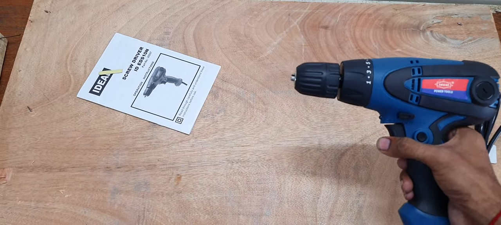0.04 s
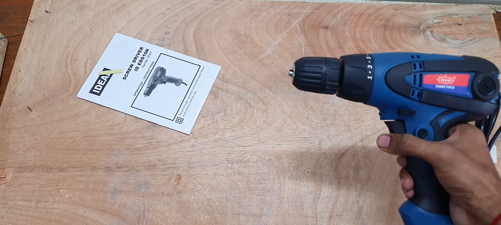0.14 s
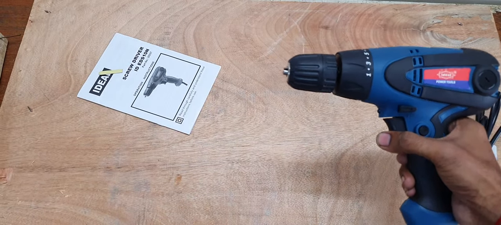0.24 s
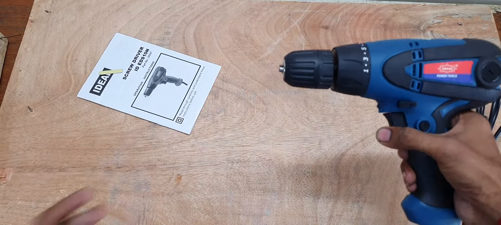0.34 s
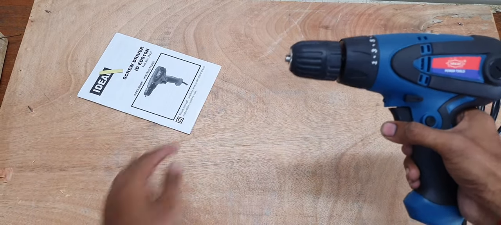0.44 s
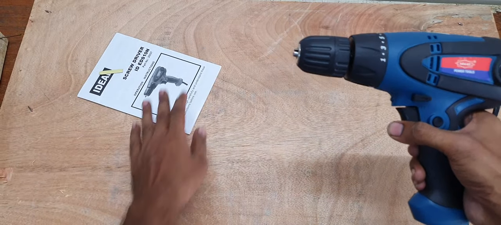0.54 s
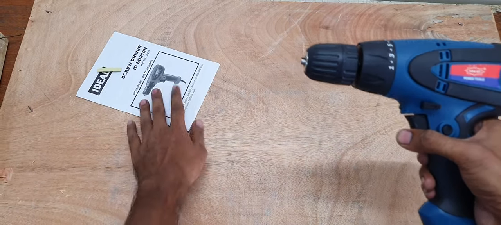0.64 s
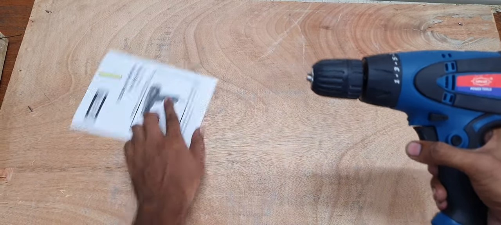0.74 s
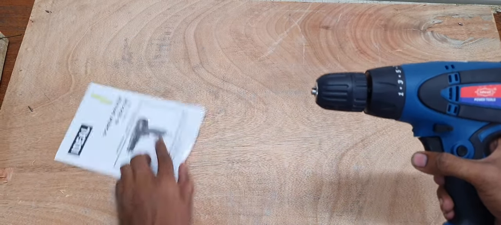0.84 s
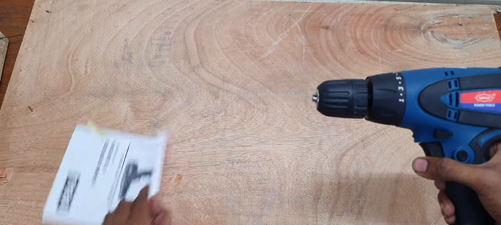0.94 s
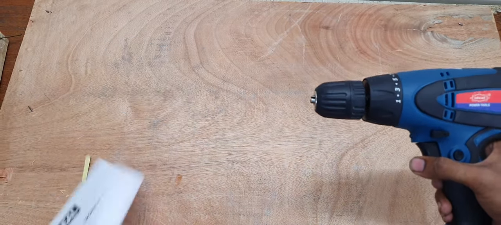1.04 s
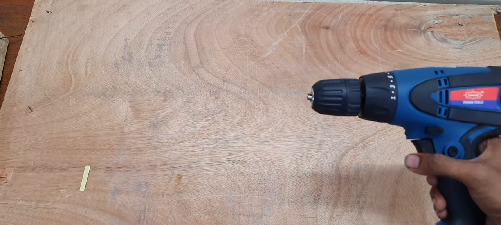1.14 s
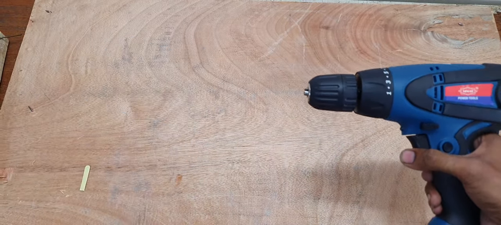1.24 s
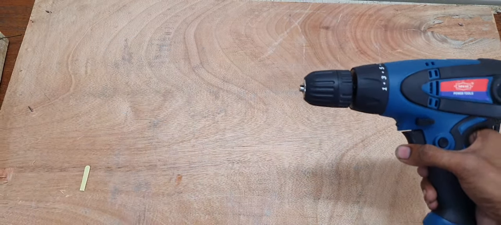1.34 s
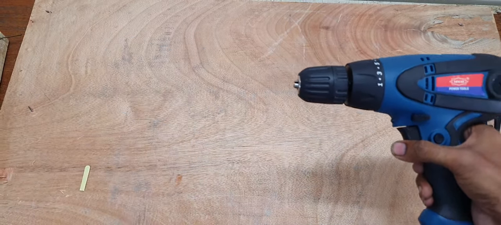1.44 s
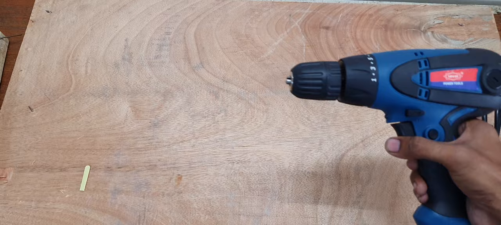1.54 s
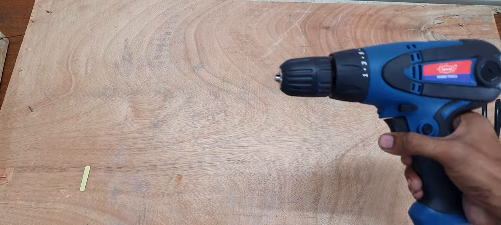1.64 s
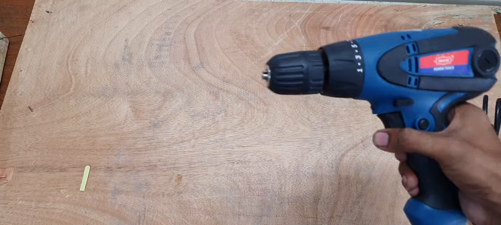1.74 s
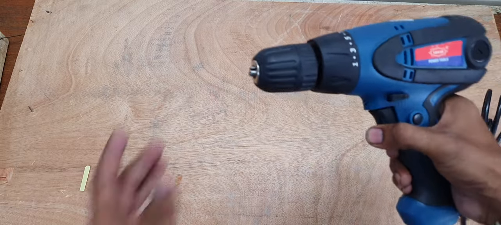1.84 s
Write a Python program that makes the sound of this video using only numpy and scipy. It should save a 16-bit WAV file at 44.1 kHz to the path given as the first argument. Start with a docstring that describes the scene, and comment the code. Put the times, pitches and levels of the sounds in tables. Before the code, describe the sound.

Quick knocks and scuffs on a wooden board die away, paper is dragged off with a bright swish and one small click, then near quiet with a hand shifting on an idle tool; low indoor rumble, close microphone.

```python
"""Over a low rumble that swells and sinks, something wooden is knocked and rattles to rest on a plywood bench.
A leaflet slides off the bench with one sharp tick; then a hand shifts on an idle power drill, itself silent.
Struck things are clicks into ringing modes; paper, grip and room air are coloured noise on level curves;
cracks are bursts of treble noise and rubs are noise in one narrow resonance. Hits also excite a dull room."""
import sys
import numpy as np
from scipy import signal
from scipy.fft import rfft, irfft
from scipy.io import wavfile

SR = 44100
rng = np.random.default_rng(int(sys.argv[2]) if len(sys.argv) > 2 else 0)


def generate_wav(signal):
    """Clip the signal to [-1, 1] and save it as 16-bit WAV at the path in sys.argv[1]."""
    frames = np.transpose(np.atleast_2d(signal))
    scaled = np.clip(frames, -1, 1) * 32767
    pcm = np.round(scaled).astype(np.int16)
    wavfile.write(sys.argv[1], SR, pcm)


N = 83790   # length in samples


def amp(db):
    """dB to gain."""
    return 10 ** (np.asarray(db) / 20)


def rms_one(x):
    """Scale to rms 1, all channels together."""
    return x / np.sqrt(np.mean(x ** 2) + 1e-20)


def in_time(rows):
    """Read level curves in dB at every sample, -120 dB outside their span."""
    s, *columns = np.transpose(rows)
    t = np.arange(N) / SR
    return [np.interp(t, s, column, left=-120, right=-120) for column in columns]


def at_hz(points, hz):
    """Read a spectrum on a log frequency axis."""
    point_hz, value = np.transpose(points)
    return np.interp(np.log(hz + 1), np.log(point_hz), value)


def drift(rate_hz):
    """Slow random movement of rms 1: noise through two equal poles, on a grid of 40 samples."""
    r = np.exp(-2 * np.pi * rate_hz * 40 / SR)
    noise = rng.standard_normal(N // 40 + 2002)
    slow = signal.lfilter([1], [1, -2 * r, r * r], noise)[2000:]   # drop the filter's start
    return np.interp(np.arange(N) / 40, np.arange(len(slow)), rms_one(slow))


def ring(x, hz, t60_s):
    """One resonant mode: a unit click sets off a decaying sine of height 1."""
    r = amp(-60 / (t60_s * SR))
    w = 2 * np.pi * hz / SR
    return signal.lfilter([0, np.sin(w)], [1, -2 * r * np.cos(w), r * r], x + 1e-18)


def low(x, hz):
    """Two-pole low-pass."""
    sos = signal.butter(2, np.clip(hz, 30, .45 * SR), fs=SR, output="sos")
    return signal.sosfilt(sos, x)


def coloured(spectrum, grain_db=0., patchy_db=0.):
    """Stereo noise of a spectrum, rms 1: grain flickers it all, patchiness moves each octave on its own."""
    # left-right likeness of the noise: hz, likeness (0 to 1)
    likeness = [(60, 0.94), (180, 0.96), (400, 0.87), (800, 0.07), (1650, 0.02), (5000, 0.012),
                (15000, .05)]
    hz = np.fft.rfftfreq(N, 1 / SR)
    mid, side = rfft(rng.standard_normal((2, N)) * amp(grain_db * drift(150)))
    alike = np.clip(at_hz(likeness, hz), 0, 1)
    stereo = np.sqrt(1 + alike) * mid + np.sqrt(1 - alike) * side * [[1], [-1]]
    stereo = amp(at_hz(spectrum, hz)) * stereo
    octave = np.log2(hz + 1)
    out = 0
    for k in range(3, 16):
        band = np.clip(1 - abs(octave - k), 0, 1)   # overlapping triangles
        out = out + irfft(stereo * band, N) * amp(patchy_db * drift(10))
    return rms_one(out)


def knocks():
    """Soft contacts and dying rattles ring the wood's modes; fine grit grinds its upper modes in between."""
    # the knocks: start_s, level_db, middle_db and upper_db (modes against the lowest), rattle_t60_s
    knock_rows = [(.182, -5, 1.5, -10, 0.0069), (.185, -12, -7, 0, 0.014), (0.2002, -10.5, -3, -6, 0.021),
                  (0.2094, -11, 2.5, -1, 0.014), (0.229, -18, -5, 3, 0.019), (0.262, -14, -2, 2, 0.041),
                  (0.269, -16.5, -13, 1, 0.025), (.279, -19, -14, 3, 0.057), (.294, -14.5, 0.5, -14, 0.028),
                  (0.31, -13, 1.5, -6, 0.036), (.317, -16, -3, -11, 0.041), (.333, -29, -3, 0, 0.044),
                  (.376, -20.5, 4.5, -3, 0.081), (.394, -28, 7, -3, 0.18), (0.426, -8, -2.5, -5, 0.047),
                  (0.437, -27.5, -2, 8, 0.023), (0.448, -21, 4, 3.5, 0.05), (.472, -21, -6.5, -3.5, 0.044),
                  (.499, -22, 1.5, -0.5, 0.061), (0.514, -39, 8, -7, 0.023)]
    # modes the wood rings with: pitch_hz, level_db, t60_s
    wood_modes = [(97, -10.5, 0.15), (287, 3, 0.039), (302, 0, 0.011), (369, 1.5, 0.033), (485, -4, 0.046),
                  (550, 0, 0.041), (672, 4, 0.015), (698, 3, 0.024), (888, -1.5, 0.022), (962, 2.5, 0.019),
                  (1133, -2.5, 0.036), (1182, -2.5, 0.03), (1515, -1.5, 0.014), (1711, -13, 0.084),
                  (2015, -2, 0.0057), (2540, -31, 0.013), (2850, -9, 0.0075), (3190, -21, 0.018)]
    # wood scuffing between knocks: time_s, grind_db, treble_db
    scuff = [(.179, -42, -40), (.183, -31, -38), (.215, -45, -37.5), (.259, -62, -42.5), (.2615, -63, -36),
             (.272, -50, -38.5), (.29, -37, -37), (.3, -62, -39), (.33, -57, -42), (.363, -59, -44.5),
             (.393, -49, -41), (.422, -66, -41.5), (.432, -39, -42), (.45, -42, -41.5), (.481, -45, -46.5),
             (.5, -54, -43.5), (.519, -39, -50), (.54, -60, -45), (.593, -53, -64), (.63, -62, -48.5)]
    # loudness of the modes under grinding: pitch_hz, level_db
    grind_modes = [(800, -14), (1300, -5), (1900, 0), (2500, -4), (3200, -10)]
    # treble of the scuffing: pitch_hz, level_db (relative, per Hz)
    scuff_treble = [(2000, 5), (3500, 0.5), (7000, -3.5), (15000, -18.5)]
    rattles_per_s, rattle_db, grinds_per_s, grind_t60_s = 800, -12, 3100, .03
    wood_db, contact_hz, middle_from_hz, upper_from_hz = -7, 1400, 450, 800

    size = SR // 3
    t = np.arange(size) / SR
    out = np.zeros(N + size)
    for s, db, middle_db, upper_db, rattle_t60 in knock_rows:
        bounces = (rng.random(size) < rattles_per_s / SR) * rng.standard_normal(size)
        touches = bounces * amp(rattle_db - 60 * t / rattle_t60)
        touches[0] = 1   # the knock itself
        push = low(touches, contact_hz)   # soft contact
        struck = 0
        for k, (hz, level_db, mode_t60) in enumerate(wood_modes):
            mode_db = level_db + rng.normal(0, 1.5)   # no two knocks alike
            if hz > upper_from_hz:
                mode_db += upper_db
            elif hz > middle_from_hz:
                mode_db += middle_db
            struck = struck + amp(mode_db) * (-1) ** k * ring(push, hz, mode_t60)
        out[int(s * SR):][:size] += amp(db + wood_db) * struck

    grind_db, treble_db = in_time(scuff)
    grit = (rng.random(N) < grinds_per_s / SR) * rng.standard_normal(N)
    grind = 0
    for k, (hz, _, _) in enumerate(wood_modes):
        if hz > upper_from_hz:
            grind = grind + amp(at_hz(grind_modes, hz)) * (-1) ** k * ring(grit, hz, grind_t60_s)
    wood = out[:N] + amp(grind_db) * rms_one(grind)
    return wood, amp(treble_db) * coloured(scuff_treble, grain_db=1.0)


def cracks():
    """Each crack is an abrupt, fast-dying burst of random-sign noise, thinned to its treble."""
    # the cracks: start_s, level_db (before thinning)
    crack_rows = [(.1823, -49), (0.2604, -28.5), (0.269, -32), (1.8211, -54)]
    t60_s, treble_from_hz = 0.0041, 3600
    t = np.arange(N) / SR
    shape = sum(amp(db - 60 * np.abs(t - s) / t60_s) * (t >= s) for s, db in crack_rows)
    x = shape * rng.choice([-1, 1], N)
    return x - low(x, treble_from_hz)


def ticks():
    """A hard little contact rings a light stiff body."""
    # the ticks: start_s, level_db (relative), upper_db (upper modes against the lower)
    tick_rows = [(.979, -12, -5), (0.9882, -28, -2), (1.7794, -34, 10), (1.822, -30, -7)]
    # modes of the light body: pitch_hz, level_db, t60_s
    body_modes = [(760, 0, 0.0081), (1200, -8, 0.029), (1470, 0, 0.019), (2085, 2.5, 0.018),
                  (3200, -9, 0.012), (4180, -7, 0.02), (6200, -16, .012)]
    tick_db, upper_from_hz, thin_hz = -11.5, 2600, 500
    s, db, upper_db = np.transpose(tick_rows)
    out = 0
    for hz, level_db, t60 in body_modes:
        clicks = np.zeros(N)
        clicks[(s * SR).astype(int)] = amp(db + tick_db + level_db + upper_db * (hz > upper_from_hz))
        out = out + ring(clicks, hz, t60)
    return out - low(out, thin_hz)


def leaflet():
    """Paper dragged over wood grain: bright hiss and a duller scrape."""
    # the slide: time_s, hiss_db, scrape_db
    slide = [(.72, -65, -114), (.736, -50.5, -69), (.765, -38.5, -50), (.8, -35.5, -44.5), (.858, -34, -50),
             (.88, -36.5, -51), (.892, -38, -42), (.913, -33.5, -41), (.925, -38, -47), (.956, -37, -38.5),
             (.976, -33.5, -72), (.987, -32.5, -22), (1.005, -34.5, -51), (1.025, -44, -49),
             (1.06, -50, -66), (1.104, -52, -69), (1.158, -50.5, -47), (1.172, -41, -70),
             (1.19, -40.5, -41.5), (1.215, -49, -47.5), (1.25, -77, -80)]
    # spectrum of the hiss: pitch_hz, level_db (relative, per Hz)
    hiss_colour = [(1500, -1.5), (2500, -2.5), (3900, 4), (4500, 3.5), (5700, 3), (6500, 5), (7500, 1.5),
                   (10000, -4.5), (13000, -9), (16000, -9)]
    # spectrum of the scrape: pitch_hz, level_db (relative, per Hz)
    scrape_colour = [(200, -25), (500, -6), (1200, -9), (1900, -7), (2600, -10), (6000, -33)]
    hiss_db, scrape_db = in_time(slide)
    hiss = coloured(hiss_colour, grain_db=1.34, patchy_db=1.8)
    scrape = coloured(scrape_colour, grain_db=1.0, patchy_db=4.0)
    return amp(hiss_db) * hiss + amp(scrape_db) * scrape


def rubs():
    """Gritty friction of one surface on another sings in one narrow resonance for a moment."""
    # the rubs: centre_s, half_length_s, pitch_hz, width_hz, level_db
    rub_rows = [(0.272, .005, 1100, 200, -30.5), (0.274, 0.0084, 1730, 300, -29),
                (0.288, 0.0064, 2170, 350, -34.5), (0.452, 0.023, 3150, 70, -45),
                (.519, 0.015, 2020, 250, -38.5), (0.833, 0.038, 4470, 250, -42.5),
                (.84, 0.037, 5720, 350, -39), (0.907, 0.013, 1930, 249, -37.5),
                (1.755, 0.022, 3420, 40, -57.5), (1.844, 0.093, 3370, 150, -58)]
    t = np.arange(N) / SR
    out = 0
    for s, half_length, hz, width_hz, db in rub_rows:
        t60 = np.log(1000) / (np.pi * width_hz)   # the narrower, the longer it rings
        sung = rms_one(ring(rng.standard_normal((2, N)), hz, t60))
        out = out + amp(db) * np.exp(-((t - s) / half_length) ** 4) * sung
    return out


def rustles():
    """The hand shifting on the grip, and brief faint bright wisps, both as grainy noise."""
    # the hand on the grip: time_s, level_db
    hand = [(1.68, -87), (1.696, -65), (1.72, -72), (1.777, -66), (1.779, -42), (1.81, -47), (1.826, -43),
            (1.86, -46.5), (1.9, -55)]
    # spectrum of the hand: pitch_hz, level_db (relative, per Hz)
    hand_colour = [(600, -8), (1500, -5.5), (3300, -7), (6000, -13.5), (10000, -25), (16000, -30)]
    # the wisps, each peaking one length after its start: start_s, peak_db, length_s
    wisp_rows = [(0.554, -50.5, 0.011), (0.677, -48, 0.016), (1.058, -52, 0.0035), (1.373, -49, 0.0092),
                 (1.868, -53, 0.012)]
    # spectrum of the wisps: pitch_hz, level_db (relative, per Hz)
    wisp_colour = [(2000, 5), (6000, 5), (12000, -5)]
    t = np.arange(N) / SR
    swells = sum(amp(db) * np.exp(-((t - s - length) / length) ** 2) for s, db, length in wisp_rows)
    grip = amp(in_time(hand)[0]) * coloured(hand_colour, grain_db=3.5)
    return grip + swells * coloured(wisp_colour, grain_db=2.5)


def room(x):
    """Dense dull reflections as decaying noise, alike in both channels only in the bass."""
    t60_s, build_s, level_db = 0.25, 0.01, -5
    wall_cut_hz, alike_below_hz, thin_hz = 4400, 710, 247
    t = np.arange(SR // 2) / SR
    decay = amp(-60 * t / t60_s) * np.minimum(t / build_s, 1)
    mid, side = rng.standard_normal((2, len(t))) * decay
    side = side - low(side, alike_below_hz)
    mid = mid - low(mid, thin_hz)
    tail = low(np.array([mid + side, mid - side]), wall_cut_hz) / np.sqrt(np.sum(mid ** 2))
    return amp(level_db) * signal.fftconvolve(x[None], tail)[:, :N]


def room_tone():
    """Steady air of the room as noise; its low rumble swells and sinks."""
    # spectrum of the air: pitch_hz, level_db (relative, per Hz)
    air_colour = [(20, -51), (32, -35), (48, -3), (65, -0.5), (100, -2.5), (127, -10), (157, -16.5),
                  (210, -25), (275, -11.5), (330, -18), (400, -16), (480, -14), (560, -17.5), (695, -19),
                  (800, -20.5), (1020, -22.5), (1560, -28), (2500, -29.5), (4000, -35), (7000, -39),
                  (11000, -48), (16000, -49)]
    # swelling of the rumble, heard against its mean: time_s, level_db
    rumble = [(0.0, -31.5), (0.164, -31), (0.194, -24), (0.402, -37.5), (0.492, -27), (0.724, -32.5),
              (0.882, -28), (1.016, -35.5), (1.216, -27), (1.344, -36), (1.364, -32), (1.512, -35.5),
              (1.544, -26.5), (1.64, -32), (1.692, -29.5), (1.794, -35), (1.836, -30.5), (1.9, -34.5)]
    tone_db, rumble_below_hz = -36, 146
    tone = amp(tone_db) * coloured(air_colour, patchy_db=0.9)
    rumble_db = in_time(rumble)[0]
    swell = amp(rumble_db - rumble_db.mean())
    bass = irfft(rfft(tone) * (np.fft.rfftfreq(N, 1 / SR) < rumble_below_hz), N)
    return tone + (swell - 1) * bass


def scene():
    """Knocks reach the left port a moment first, ticks and cracks both at once; room and noises join them."""
    dip_hz, dip_q = 190, 1.6   # a dip in the knocks where the room answers weakly
    knock_lead_s, small_room_db = 0.00011, -1.5
    wood, wood_treble = knocks()
    wood = signal.lfilter(*signal.iirnotch(dip_hz, dip_q, SR), wood)
    small = ticks() + cracks()
    late = np.interp(np.arange(N) - knock_lead_s * SR, np.arange(N), wood)
    hits = np.array([wood, late]) + small + room(wood + amp(small_room_db) * small)
    return hits + wood_treble + leaflet() + rubs() + rustles() + room_tone()


def record(dry):
    """The left port is the more sensitive, the treble response is uneven, and the top is cut."""
    # balance of the ports: pitch_hz, left_over_right_db
    left_db = [(30, 2), (180, 2), (550, 4), (1650, 2), (5000, 2), (9000, 0.5), (14000, 1.5)]
    # treble response of the microphone: pitch_hz, level_db
    microphone = [(6800, 0), (7600, -4), (11500, 1.5), (12500, 5.5), (16000, 4.5)]
    hz = np.fft.rfftfreq(N, 1 / SR)
    tilt = amp(at_hz(left_db, hz) * [[.5], [-.5]] + at_hz(microphone, hz))
    top_cut = signal.cheby2(16, 70, 16300, fs=SR, output="sos")   # 70 dB down from 16300 Hz
    return signal.sosfilt(top_cut, irfft(rfft(dry) * tilt, N))


dry = scene()
out = record(dry)
generate_wav(out)
```